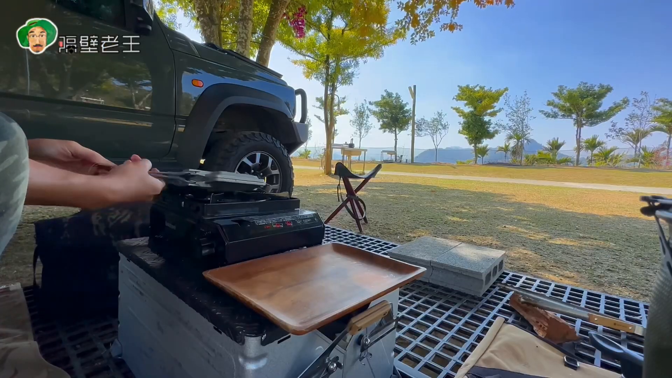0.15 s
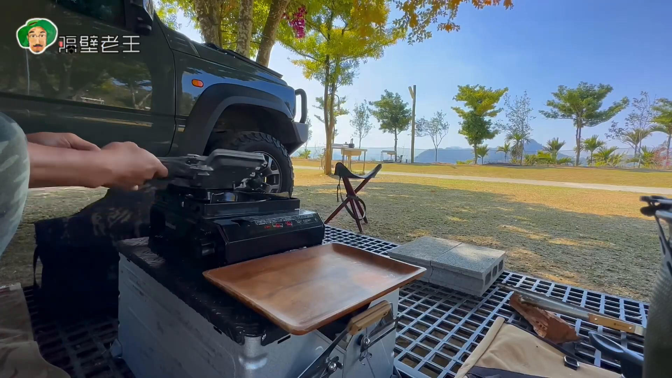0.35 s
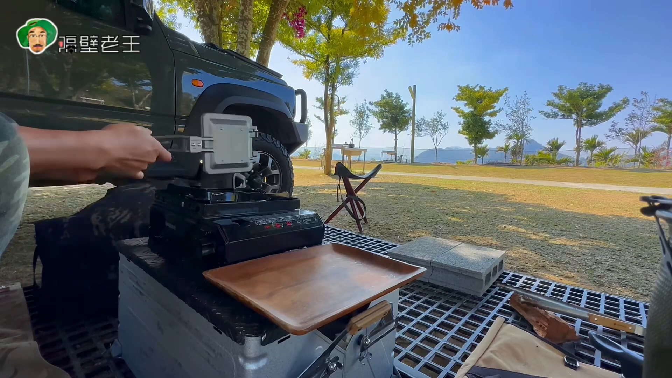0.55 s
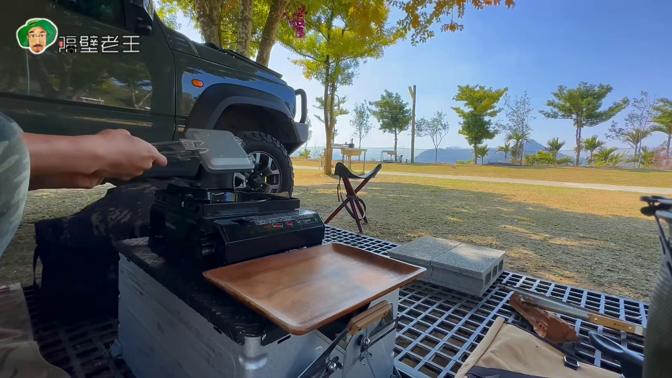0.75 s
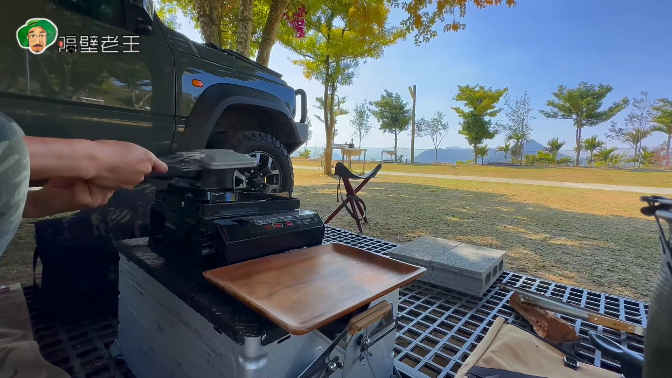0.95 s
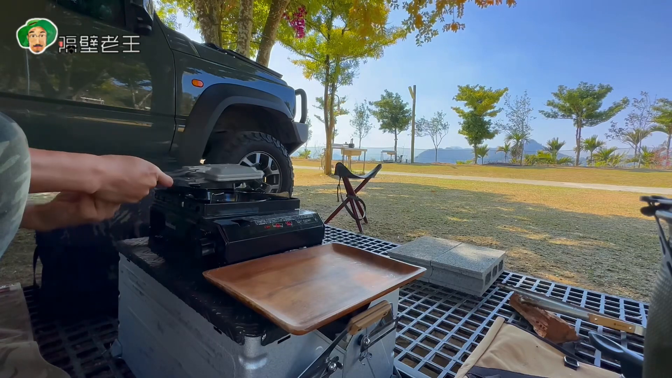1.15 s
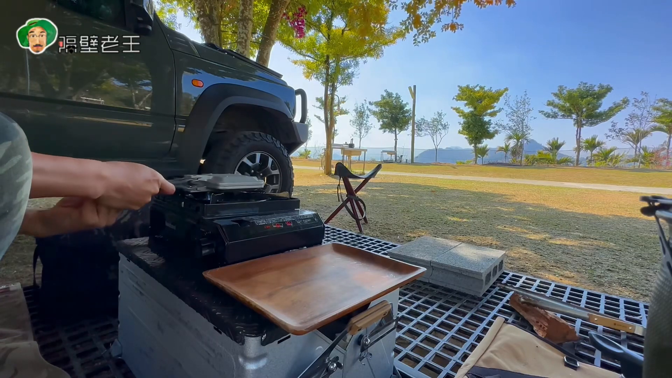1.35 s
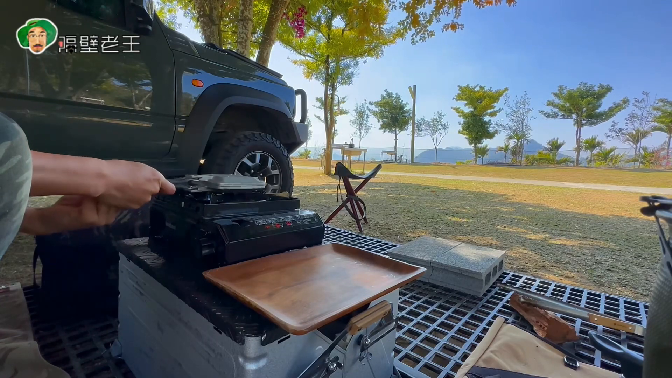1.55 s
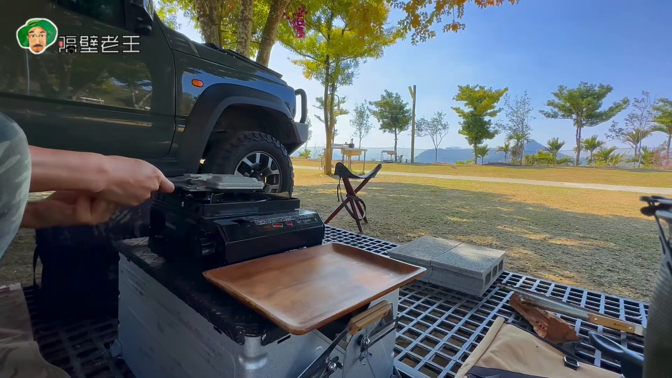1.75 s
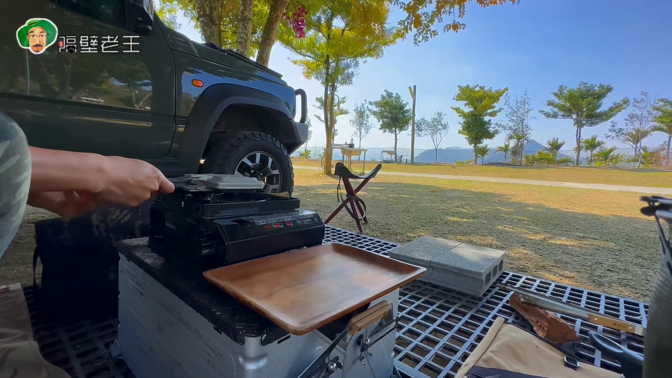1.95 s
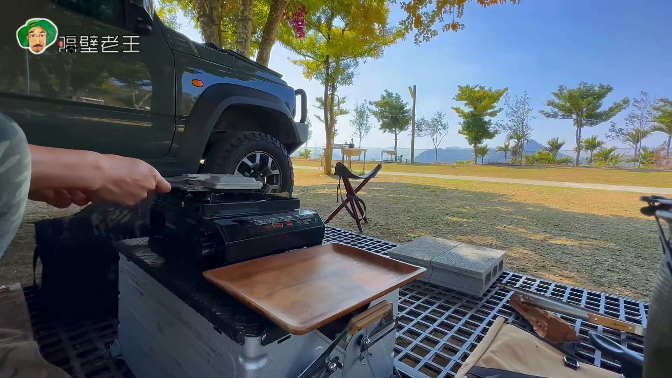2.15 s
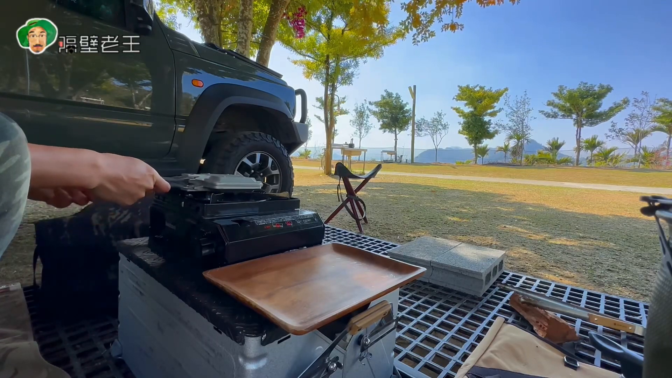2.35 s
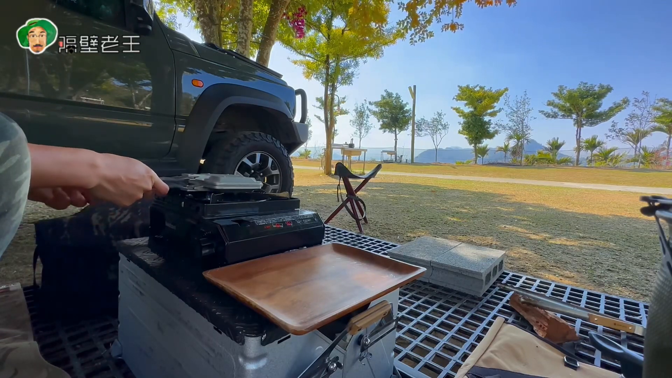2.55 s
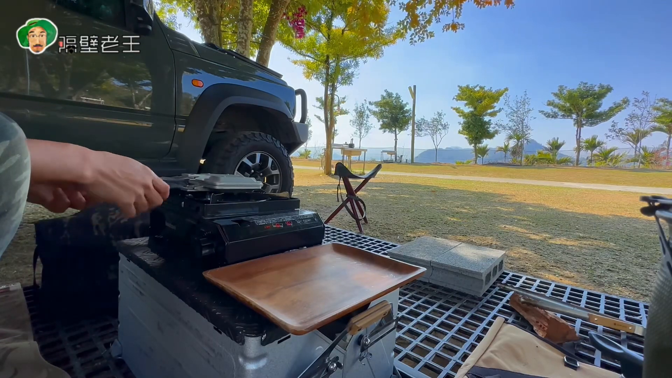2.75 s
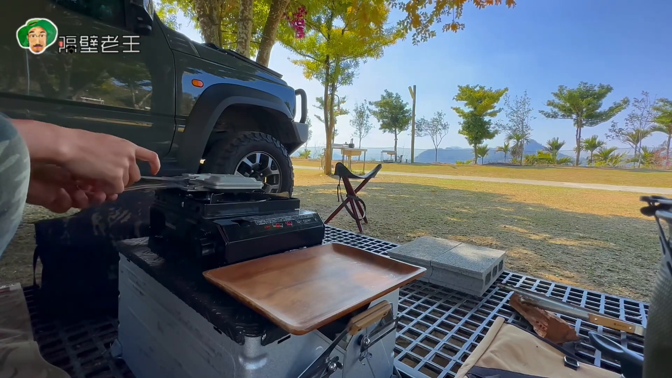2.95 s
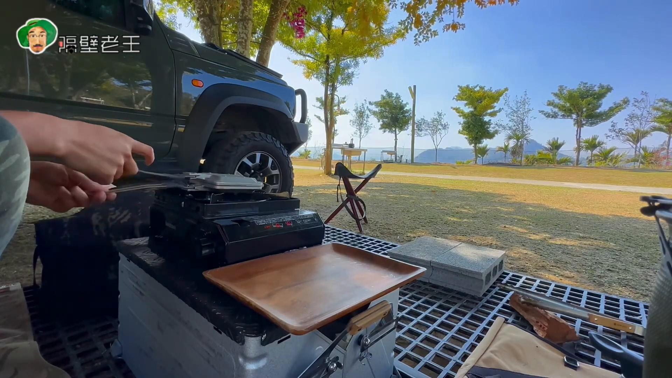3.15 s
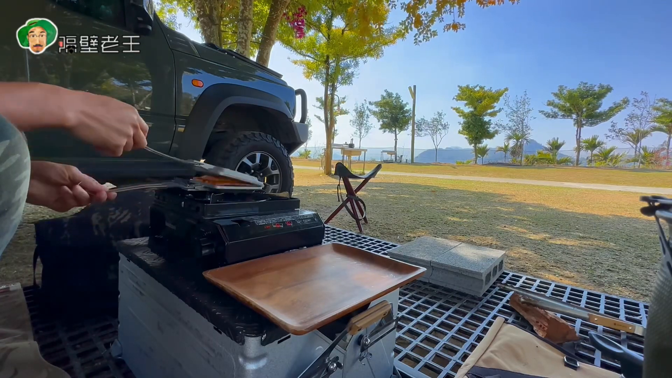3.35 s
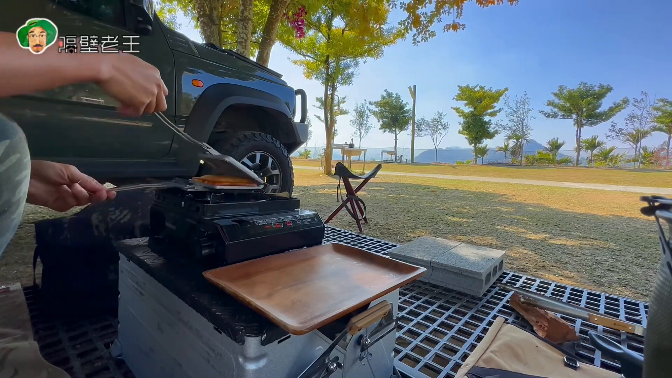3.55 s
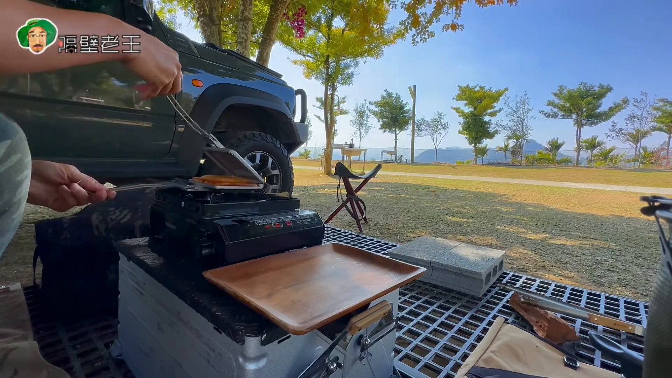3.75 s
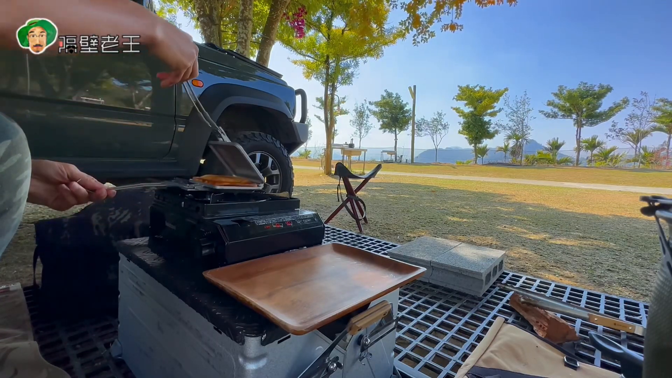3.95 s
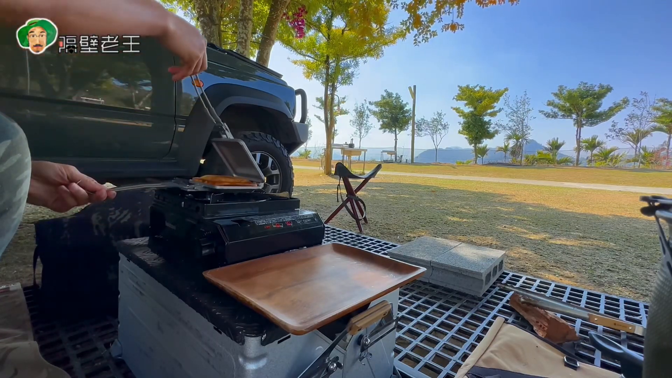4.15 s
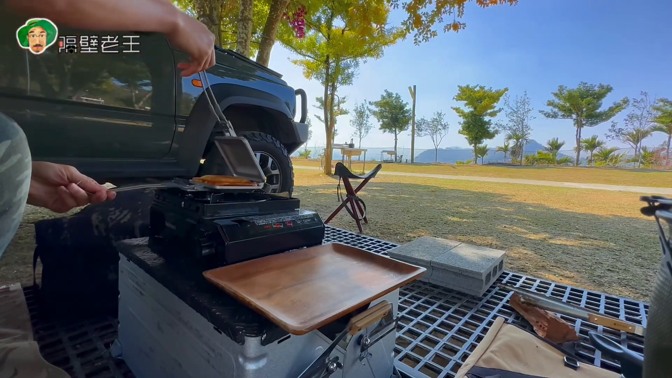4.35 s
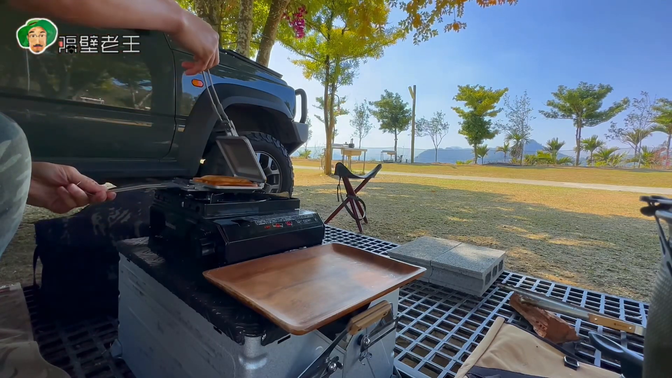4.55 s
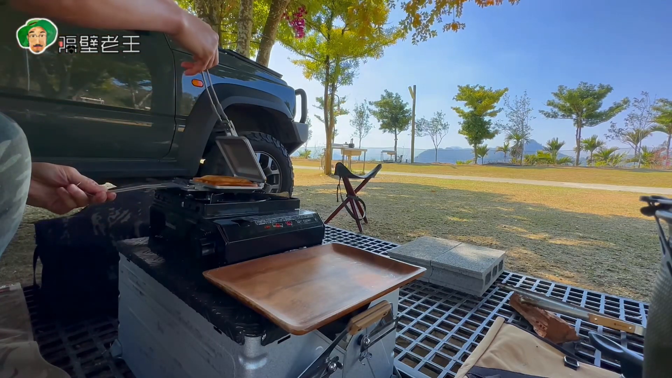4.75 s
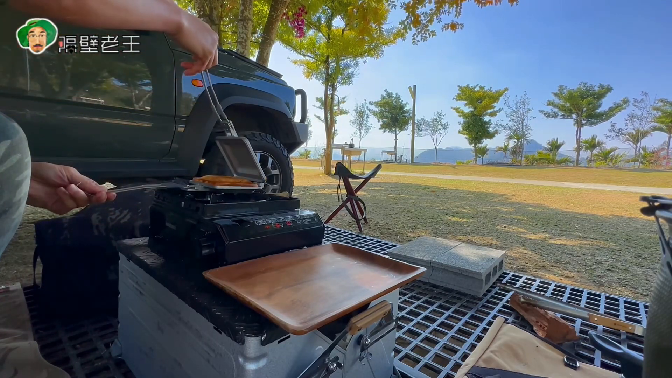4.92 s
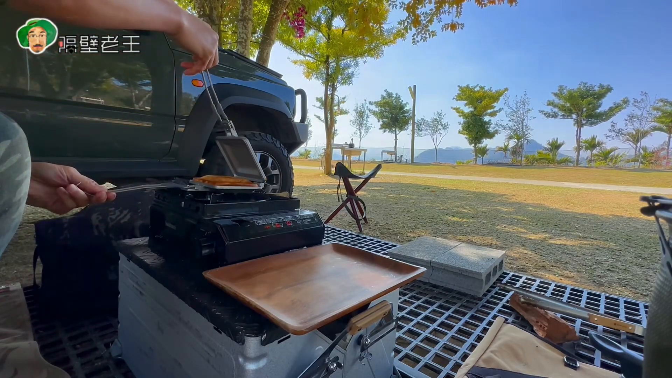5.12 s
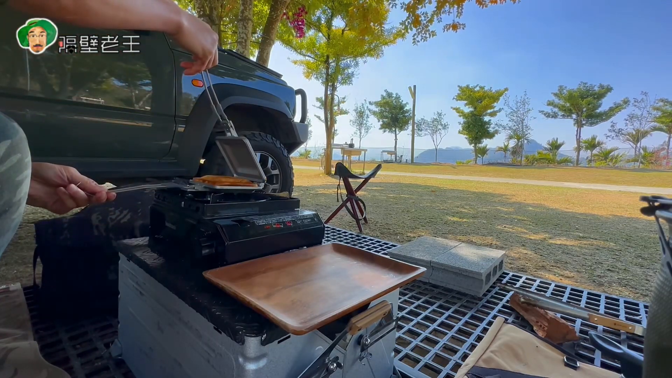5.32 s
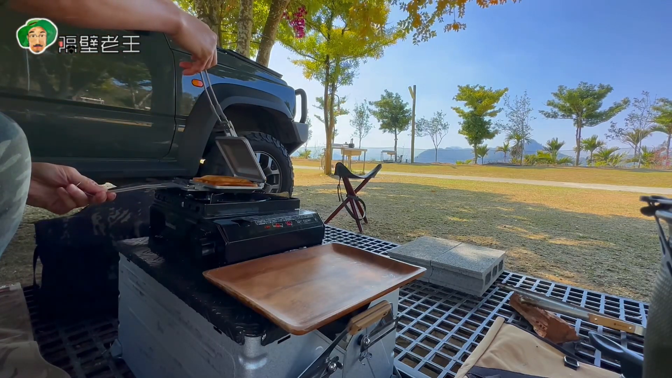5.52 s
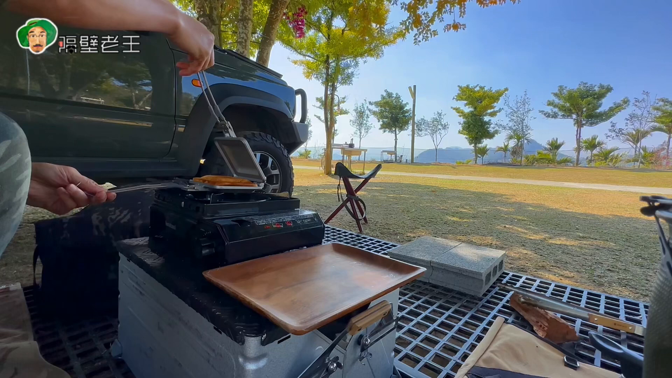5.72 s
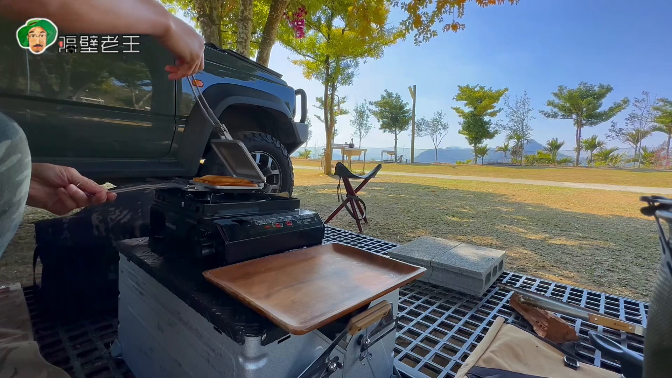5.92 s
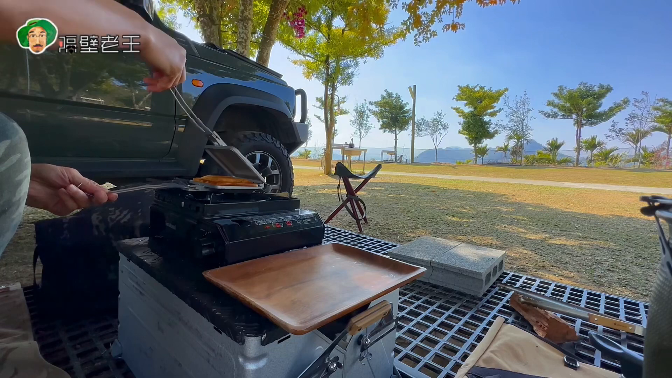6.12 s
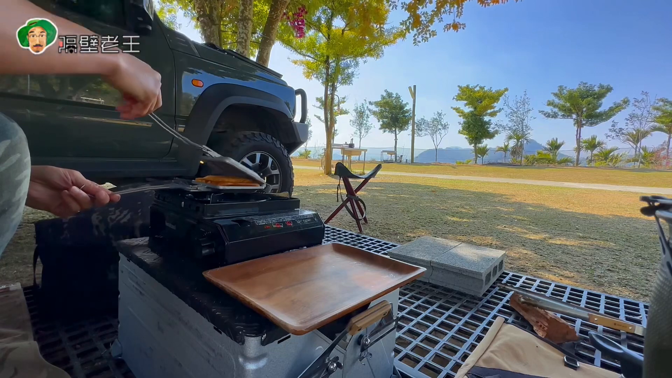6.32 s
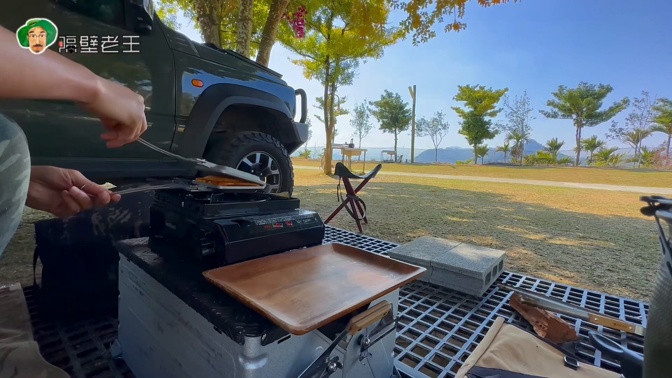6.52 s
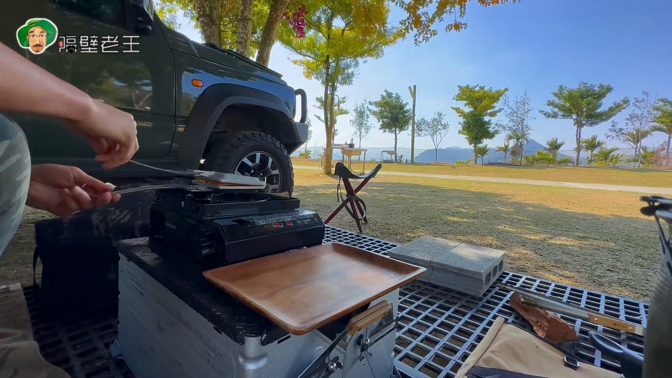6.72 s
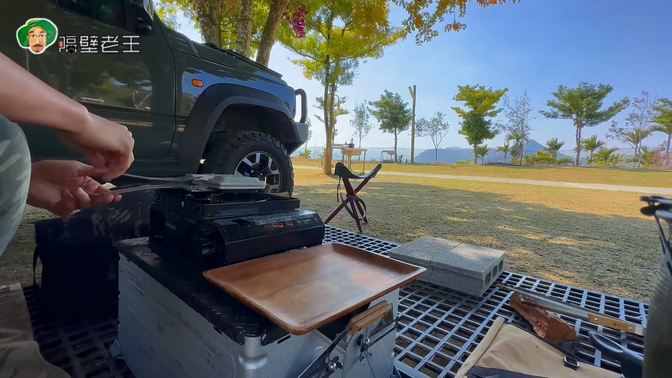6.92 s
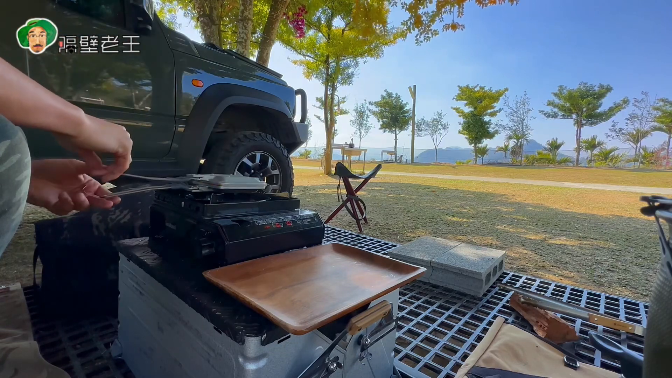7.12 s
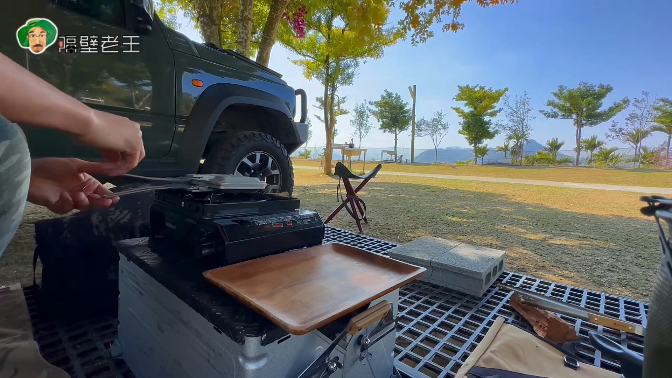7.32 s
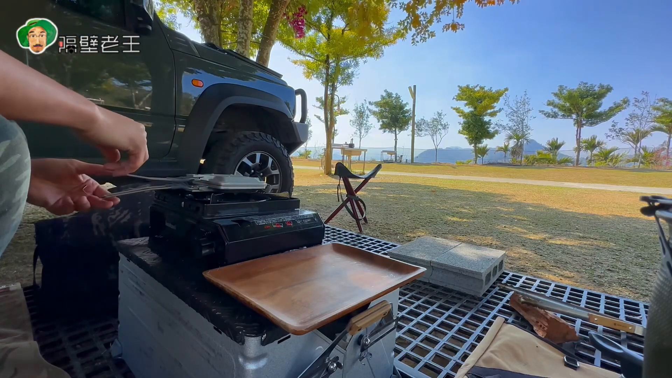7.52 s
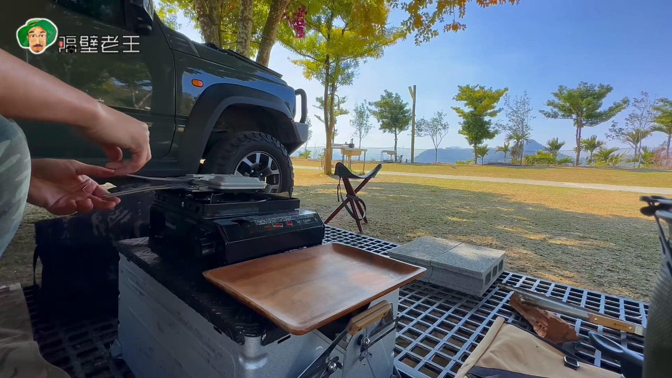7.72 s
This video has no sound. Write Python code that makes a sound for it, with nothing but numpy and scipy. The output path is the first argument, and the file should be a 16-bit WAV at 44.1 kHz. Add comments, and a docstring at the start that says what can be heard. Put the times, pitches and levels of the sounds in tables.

```python
"""Sandwich press on a camping stove, close, in wind

A long-handled metal press is turned over, set down, opened and shut again, a little left of a two-port
microphone. Blows ring filtered noise and decaying modes; scrapes, hinge judder and a late rasp shape noise.
Wind rumbles as band-split noise, with falling thumps for eddies at the ports, over a soft outdoor hiss.
The level dips briefly near the end; then the hiss has another tint and the wind less bass."""
import sys
import numpy as np
from scipy import signal
from scipy.fft import rfft, irfft, next_fast_len
from scipy.io import wavfile
from scipy.ndimage import uniform_filter1d

SR = 44100
rng = np.random.default_rng(int(sys.argv[2]) if len(sys.argv) > 2 else 0)


def dump(signal):
    """Clip the signal to [-1, 1] and save it as 16-bit WAV at the path in sys.argv[1]."""
    limited = np.clip(np.atleast_2d(signal).T, -1, 1)
    pcm = np.round(limited * 32767).astype(np.int16)
    wavfile.write(sys.argv[1], SR, pcm)


N = 343098
T = np.arange(N) / SR

# Levels in the tables are relative, ahead of the trims in the functions.
# the shut plates clap together: (time [s], peak level [dB], upper-mid colour [dB], treble colour [dB],
# contact time [s], ring level [dB], decay factor [ratio])
BLOWS = [(0.665, -54.5, -8, -21, 0.0055, -13, 0.36), (0.745, -61, -12, -25, 0.004, -8, 0.45),
         (1.345, -24, 2, -4.5, 0.0047, -8, 1.07), (3.519, -49.5, -18, -27, 0.0055, -19, 1.03),
         (6.624, -49, -14, -32, 0.0093, -9, 0.77), (6.720, -42, -7, -21, 0.012, -5, 0.7)]
# what the press rings with: (frequency [Hz], level [dB], time to fall 60 dB [s])
PRESS_MODES = [(532, 2, .22), (562, -5, .2), (724, 1, .2), (803, -3, .2), (977, 0, .19), (1159, 0, .22),
               (1283, -7, .18), (1319, -3, .16), (1860, -5, .17), (1989, -5, .15), (2040, -6, .17),
               (2145, -7, .18), (2580, -11, .2), (2883, -9, .15), (3250, -9, .14), (3324, -5, .13),
               (3644, -4, .19), (3881, -11, .16), (4029, -6, .16), (4500, -8, .14), (4885, -11, .14),
               (4928, -9, .15), (5335, -11, .2), (5515, -7, .14), (5658, -6, .17), (6460, -14, .12),
               (6942, -11, .12), (8575, -23, .2)]
# the press knocks on the stove top: (time [s], peak level [dB], upper-mid colour [dB], treble colour [dB],
# contact time [s], ring level [dB], decay factor [ratio])
LANDINGS = [(1.422, -26, -1.5, -16, 0.0065, -5, 0.83), (1.587, -33, -3, -26, 0.0079, -9, 1.33),
            (1.715, -44, -15, -22, 0.0097, -9, 2.7), (1.748, -45.5, -14, -22, 0.006, -4, 1.1),
            (1.885, -35.5, -1.5, -17, 0.0059, -9.5, 0.98), (2.085, -44, -9, -26, 0.0065, -5, 1.4),
            (6.788, -30, -0.5, -13.5, 0.011, -13, 1.11)]
# what press and stove top ring with together: (frequency [Hz], level [dB], time to fall 60 dB [s])
STOVE_MODES = [(468, -3, .17), (526, 3, .17), (600, -3, .17), (713, -4, .17), (785, -3, .16),
               (872, -7, .18), (1055, -10, .17), (1193, -5, .2), (1285, -9, .17), (1715, -11, .16),
               (1850, -8, .2), (2036, -10, .16), (2148, -8, .17), (2266, -9, .15), (3127, -12, .15),
               (3251, -9, .15), (3644, -11, .18), (5235, -7, .14), (5355, -7, .16), (5540, -13, .16),
               (5700, -10, .18)]
# the open lid hits its stop: (time [s], peak level [dB], upper-mid colour [dB], treble colour [dB],
# contact time [s], ring level [dB], decay factor [ratio])
LID_STOPS = [(4.483, -24.5, -1.5, -9, 0.0044, -9, 1)]
# what the free lid rings with: (frequency [Hz], level [dB], time to fall 60 dB [s])
LID_MODES = [(404, -2, .15), (490, 3, .22), (626, 1, .18), (798, -1, .2), (872, -2, .15), (1150, -2, .21),
             (1435, -12, .26), (1546, -9, .3), (1810, -4, .22), (2003, -8, .26), (2085, -5, .22),
             (2495, -5, .22), (3044, -3, .15), (3195, -6, .15), (3303, -3, .13), (3570, -7, .13),
             (4235, -8, .19), (4444, -5, .15), (4860, -7, .15), (5338, -1, .11), (5421, -4, .12),
             (5644, -8, .13)]
# the loose hinge knocks as its slack is taken up: (time [s], peak level [dB], upper-mid colour [dB],
# treble colour [dB], contact time [s], ring level [dB], decay factor [ratio])
HINGE_KNOCKS = [(0.017, -35.5, -15, -15, 0.013, -4.5, 2.6), (0.098, -23, 1.5, -13.5, 0.013, -5, 0.96),
                (0.232, -43.5, 0, -31, 0.003, -2, 0.6), (0.27, -48.5, -6, -28, 0.003, -6, 0.87),
                (6.216, -42, 1, -5.5, 0.015, -7, 1.9), (6.313, -37.5, -11, -5, 0.013, -9.5, 1.06)]
# what the hinge end rings with: (frequency [Hz], level [dB], time to fall 60 dB [s])
HINGE_MODES = [(548, 1, .16), (723, 5, .16), (795, 2, .17), (978, -2, .22), (1158, -1, .14),
               (1279, -6, .15), (1832, -5, .14), (2584, -10, .16), (3262, -5, .17), (4380, -4, .13),
               (4521, -8, .12), (4720, -7, .12), (4920, -9, .13), (5146, -8, .12), (5356, -8, .32),
               (5722, -10, .14), (9447, -13, .13)]
# the handles click as they part: (time [s], peak level [dB], upper-mid colour [dB], treble colour [dB],
# contact time [s], ring level [dB], decay factor [ratio])
CLICKS = [(3.124, -33, 0, -5.5, 0.0042, -7, 0.99), (3.215, -52, -13, -16, .008, -14, 0.97)]
# what the handles ring with: (frequency [Hz], level [dB], time to fall 60 dB [s])
HANDLE_MODES = [(503, -4, .25), (560, -2, .2), (721, -5, .18), (807, -4, .16), (1060, -3, .15),
                (1412, 7, .11), (1948, -4, .12), (2201, -2, .11), (2340, -5, .08), (3147, -7, .15),
                (3696, -8, .13), (3902, -8, .12), (4059, -6, .11), (4198, -8, .12), (6029, -12, .12),
                (7370, -15, .13), (8419, -15, .1)]
# the clasp is flipped off the handles: (time [s], peak level [dB], upper-mid colour [dB],
# treble colour [dB], contact time [s], ring level [dB], decay factor [ratio])
CLASP_FLIPS = [(2.375, -39, -2, -11, 0.0032, -1, 1)]
# what the clasp rings with: (frequency [Hz], level [dB], time to fall 60 dB [s])
CLASP_MODES = [(592, -5, .15), (723, 3, .12), (812, -3, .14), (1150, 1, .12), (1427, 3, .07),
               (1841, -9, .12), (2038, -6, .11), (2627, -9, .16), (3064, -3, .1), (3278, -7, .13),
               (3850, -13, .2), (4774, -11, .16), (5259, -6, .13)]
# the crowd of short resonances between those modes: (frequency [Hz], density [dB per Hz],
# time to fall 60 dB [s])
CLATTER = [(66, -12, 0.29), (137, 6, 0.24), (296, -3, 0.18), (399.5, -1.5, 0.25), (546, 2.5, 0.24),
           (1090, -10, 0.28), (1260, -4, 0.29), (1560, -7, 0.21), (2290, -5.5, 0.18), (3970, -10.5, 0.17),
           (4700, -11, 0.13), (5840, -11, 0.12), (6370, -12.5, 0.16), (6850, -12, 0.11), (8500, -21, 0.16),
           (9970, -15.5, 0.12), (10700, -55, 0.069), (13600, -28, 0.082)]
# strokes of metal sliding on metal: (start [s], length [s], level [dB], treble [dB])
SCRAPES = [(0.016, 0.13, -40, 0), (0.166, 0.037, -46, -18), (1.687, 0.11, -52, -20),
           (1.844, 0.046, -46.5, -2), (1.932, 0.048, -53, -22), (2.018, 0.078, -51, -15),
           (3.167, 0.097, -55.5, -1), (6.208, 0.13, -43.5, -12)]
# colour of the sliding contact: (frequency [Hz], level [dB])
SCRAPE_COLOUR = [(200, -9), (400, 7), (560, 10), (760, 8), (950, 3), (1250, -6), (2000, 1), (3500, -17),
                 (5500, -29), (8000, -37), (15000, -37)]
# the hinge catches and slips while the lid is held open: (time [s], peak level [dB])
HINGE_SLIPS = [(5.262, -50.5), (5.314, -52), (5.352, -46.5), (5.425, -49.5), (5.479, -47.5), (5.583, -51.5),
               (5.611, -52.5), (5.654, -52.5), (5.705, -56), (5.755, -58), (5.8, -58), (5.875, -51.5),
               (5.936, -56), (5.99, -52.5), (6.048, -61), (6.108, -53), (6.147, -55), (6.183, -50.5),
               (6.25, -50), (6.29, -48), (6.409, -52.5), (6.455, -55), (6.495, -57.5), (6.582, -64)]
# colour of the hinge judder: (frequency [Hz], level [dB])
JUDDER_COLOUR = [(200, -26), (380, 3.5), (550, 9.5), (720, -3), (880, 4), (1050, -5.5), (1300, 8),
                 (1520, 0), (1800, -9), (3000, -16), (6000, -45)]
# faint squeaks: (time [s], length [s], middle pitch [Hz], rms level [dB])
SQUEAKS = [(5.187, .07, 2580, -57), (5.315, .08, 2900, -56.5)]
# colour of the rasp: (frequency [Hz], level [dB])
SWELL_COLOUR = [(300, -7), (550, 6.5), (880, 14), (1250, -1), (1600, 6), (1780, -4), (1865, 7), (1960, -7),
                (2200, 6), (2500, 3), (2800, -3.5), (3300, -5), (4200, -28), (7000, -38)]
# small ticks within the rasp: (time [s], peak level [dB])
TICKS = [(7.304, -47.5), (7.397, -50), (7.42, -53), (7.524, -53), (7.551, -55), (7.582, -45.5),
         (7.603, -49), (7.624, -51), (7.67, -46), (7.708, -51), (7.73, -51)]
# the strongest eddies that hit the ports: (time [s], peak level [dB], starting pitch [Hz])
BUFFETS = [(1.829, -31, 400), (3.694, -33.5, 450), (3.727, -30, 380), (3.763, -38, 430), (3.796, -31, 395),
           (3.802, -17, 430), (3.813, -26, 555), (3.821, -23, 270), (4.119, -26.5, 600), (4.224, -37, 258),
           (4.464, -27, 400), (4.557, -28, 450), (4.638, -26.5, 443), (4.692, -24, 444),
           (4.718, -30.5, 670), (4.751, -24.5, 470), (4.815, -29, 484), (4.842, -23.5, 390),
           (4.911, -18, 586), (5.114, -31, 447), (5.196, -34, 345), (5.218, -29, 540), (5.348, -32, 407),
           (5.43, -29, 320), (5.518, -24, 400), (5.59, -22.5, 535), (6.756, -24, 290), (6.821, -17, 463),
           (6.861, -32, 260), (6.903, -26.5, 275), (6.961, -27, 414), (7.089, -26, 501), (7.182, -35, 590),
           (7.247, -31.5, 320), (7.27, -28, 623), (7.288, -27, 280), (7.471, -31, 646), (7.531, -28, 340)]
# strength of the breeze at the ports: (time [s], rms level [dB])
WIND = [(0.0, -57), (0.6, -57.5), (1.0, -58), (1.3, -53.5), (1.6, -45), (2.101, -56), (2.26, -43),
        (2.46, -63), (2.8, -71), (3.2, -52.5), (3.45, -46.5), (4.0, -48.5), (4.5, -43.5), (5.0, -43.5),
        (5.55, -43), (6.1, -52.5), (6.45, -50), (6.6, -47), (6.9, -41), (7.2, -47), (7.78, -42.5)]
# short gusts on top of it: (middle [s], width at half height [s], rms level [dB], sharpness [dB per octave])
GUSTS = [(0.347, 0.13, -49, -1), (1.161, 0.022, -40, -4.5), (1.75, 0.029, -53, -3),
         (1.854, 0.065, -42, 2.5), (3.48, 0.12, -36.5, 0.5), (3.735, 0.073, -45, 6),
         (3.819, 0.061, -30, -1), (4.242, 0.046, -33, -7), (4.339, 0.09, -38.5, 2.5),
         (4.493, 0.067, -39.5, 7), (4.643, 0.048, -37.5, 4), (4.693, 0.017, -45, 4),
         (4.747, 0.093, -35.5, 3), (4.855, 0.087, -37, 1.5), (4.931, 0.042, -30, 0.5),
         (5.02, 0.053, -40, 1), (5.095, 0.05, -35, 1.5), (5.239, 0.044, -37, 3.5), (5.351, 0.052, -38, 2),
         (5.449, 0.035, -40.5, 6), (5.546, 0.1, -34.5, 2.5), (5.684, 0.04, -32, -19),
         (6.336, 0.12, -44, -2), (6.435, 0.11, -46, 5.5), (6.771, 0.052, -34.5, 3),
         (6.846, 0.059, -39.5, 7), (6.931, 0.041, -33, 1.5), (7.1, 0.043, -43, -6),
         (7.255, 0.11, -44.5, 2.5), (7.363, 0.021, -42, 1.5), (7.45, 0.056, -42, 2),
         (7.553, 0.082, -46.5, 4)]
# colour of the wind: (frequency [Hz], level [dB])
WIND_COLOUR = [(25, -27), (40, -6.5), (60, 6.5), (90, 2.5), (140, -3), (220, -10.5), (350, -26), (550, -33),
               (900, -38.5)]
# outdoor hiss: (frequency [Hz], mid density [dB per Hz], side density [dB per Hz])
AIR = [(63, -82.5, -82), (112, -86, -92), (164, -85, -90), (236, -87, -100), (355, -84.5, -99),
       (502, -87, -88.5), (670, -100, -99), (1040, -104, -101), (1200, -102, -100), (2940, -103, -104),
       (5800, -101, -101), (8400, -104, -104), (10030, -106, -106), (10600, -110, -112)]
# tint of the hiss after the brief dip: (frequency [Hz], level [dB])
LATE_TINT = [(250, -4), (400, -15), (700, -7), (1200, -3.5), (2800, -1.5), (5500, -4.5), (8000, -2),
             (10000, 6.5), (14000, 5)]
# balance of the ports for all but the wind: (frequency [Hz], left minus right [dB])
PORT_BALANCE = [(100, 2), (700, 1), (1300, 2.5), (2400, 1.5), (4400, 5.5), (8000, 3.5), (12000, -0.5)]

SWELL_START_S, SWELL_DB, SWELL_RISE_DB_PER_S = 7.21, -74.5, 46.5
DIP_S, TOP_HZ = 7.162, 15800


def undb(db):
    """Decibels to gain."""
    return 10 ** (np.asarray(db) / 20)


def unit(x):
    """Scale to rms 1."""
    return x / np.sqrt(np.mean(x ** 2))


def at_hz(hz, table, axis=1):
    """Read a column of a spectrum table on a log-frequency axis."""
    table = np.array(table, float)
    return np.interp(np.log(np.maximum(hz, 1)), np.log(table[:, 0]), table[:, axis])


def at_time(t, table, axis=1):
    """Read a column of a control curve."""
    table = np.array(table, float)
    return np.interp(t, table[:, 0], table[:, axis])


def colour(x, table, axis=1):
    """Filter by a table of frequencies and levels."""
    n = x.shape[-1]
    size = next_fast_len(n + 2048)
    gain = undb(at_hz(np.fft.rfftfreq(size, 1 / SR), table, axis))
    return irfft(rfft(x, size) * gain, size)[..., :n]


def bands(x, centres):
    """Split into overlapping bands that sum to the whole."""
    n = x.shape[-1]
    size = next_fast_len(n)
    spectrum = rfft(x, size)
    pitch = np.log(np.fft.rfftfreq(size, 1 / SR) + 1)
    weights = [np.interp(pitch, np.log(centres), row) for row in np.eye(len(centres))]
    return [irfft(spectrum * weight, size)[..., :n] for weight in weights]


def noise(n, likeness=0):
    """Two channels of white noise with a given correlation."""
    mid, side = rng.standard_normal((2, n))
    c = np.clip(likeness, -1, 1)
    return np.sqrt((1 + c) / 2) * mid + np.sqrt((1 - c) / 2) * np.array([side, -side])


def walk(rate, n=N):
    """Random levels held 1 / rate s and smoothed; spread near 1."""
    k = max(int(SR / rate), 1)
    steps = np.repeat(rng.standard_normal(n // k + 2), k)
    return unit(uniform_filter1d(uniform_filter1d(steps, k), k))[:n]


def add(out, start_s, sound):
    """Mix a sound in at a given time."""
    i = max(int(start_s * SR), 0)
    out[:, i:i + sound.shape[1]] += sound[:, :N - i]


def peak_level(x, lo_hz, hi_hz):
    """Highest short-term level within a band."""
    band = signal.sosfilt(signal.butter(2, [lo_hz, hi_hz], "band", fs=SR, output="sos"), x)
    return np.sqrt(uniform_filter1d(np.mean(band ** 2, 0), SR // 60).max())


def clack(mode_table, contact_s, ring_db, decay):
    """The loose parts chatter for a moment, then ring out; the stove below answers late with a thud."""
    rise_s, low_rise_s, ring_rise_s = 0.0025, 0.012, 0.0011
    t = np.arange(SR // 3) / SR
    free = np.maximum(t - contact_s, 0) / decay
    # every blow lands elsewhere and favours other groups of short resonances
    spot = np.column_stack([np.geomspace(400, 15000, 44), 1.6 * rng.standard_normal(44)])
    hz, _, t60 = np.transpose(CLATTER)
    crowd = bands(unit(colour(colour(noise(len(t), 0.4), CLATTER), spot)), hz)
    body = 0
    for band, f, d in zip(crowd, hz, t60):
        onset = 1 - np.exp(-t / (low_rise_s if f < 400 else rise_s))
        body = body + band * np.exp(-np.log(1000) * free / d) * onset
    # the long modes keep their pitch, but reach the two ports in differing phases
    hz, db, t60 = np.transpose(mode_table)[:, :, None]
    share = undb(db + rng.standard_normal(db.shape))
    modes = share * np.exp(2j * np.pi * hz * t - np.log(1000) * free / t60)
    phase = 2 * np.pi * rng.random(len(hz)) + 0.92 * rng.standard_normal((2, len(hz)))
    ring = (np.exp(1j * phase) @ modes).imag
    return body + undb(ring_db) * ring * (1 - np.exp(-t / ring_rise_s))


def blows(table, mode_table, gain_db, upper_db, treble_db, pan_db, thud_db=0.0):
    """Each blow has its own force and hardness: harder contact is brighter."""
    out = np.zeros((2, N))
    pan = np.array([[pan_db], [-pan_db]]) / 2  # pan_db is left minus right
    for s, db, upper, treble, contact_s, ring_db, decay in table:
        hardness = [(280, thud_db), (420, 0), (1200, 0.0031), (2300, upper + upper_db), (5500, treble + treble_db)]
        hit = colour(clack(mode_table, contact_s, ring_db, decay), hardness)
        level = undb(db + gain_db + pan)
        add(out, s - 0.002, hit / peak_level(hit, 275, 1940) * level)
    return out


def plates():
    """The shut plates clap together and ring with the modes of the press."""
    return blows(BLOWS, PRESS_MODES, gain_db=0, upper_db=0.0, treble_db=7.0, pan_db=-0.5, thud_db=1)


def landings():
    """The press knocks on the stove top and the two ring together."""
    return blows(LANDINGS, STOVE_MODES, gain_db=-3.0, upper_db=-0.5, treble_db=7.5, pan_db=0.0, thud_db=3)


def lid_stop():
    """The open lid hits its stop and rings freely."""
    return blows(LID_STOPS, LID_MODES, gain_db=-4.5, upper_db=4.5, treble_db=6.5, pan_db=1.3, thud_db=-4.5)


def hinge_knocks():
    """The loose hinge knocks as its slack is taken up."""
    return blows(HINGE_KNOCKS, HINGE_MODES, gain_db=-7.0, upper_db=4.0, treble_db=7.0, pan_db=-0.5)


def handle_clicks():
    """The long handles click and ring as they part."""
    return blows(CLICKS, HANDLE_MODES, gain_db=-3.0, upper_db=2.0, treble_db=6.5, pan_db=0.5)


def clasp_flip():
    """The clasp rings as it is flipped off the handles."""
    return blows(CLASP_FLIPS, CLASP_MODES, gain_db=-2.0, upper_db=7.0, treble_db=7.5, pan_db=-0.5)


def resonate(force, width_hz=28):
    """Drive the modes of the press, damped by the contact."""
    t = np.arange(SR // 8) / SR
    hz, db, _ = np.transpose(PRESS_MODES)[:, :, None]
    modes = undb(db) * np.exp((2j * hz - width_hz) * np.pi * t)
    response = (np.exp(2j * np.pi * rng.random((2, len(hz)))) @ modes).imag
    return unit(signal.fftconvolve(force, response, axes=1)[:, :force.shape[1]])


def scrapes(gain_db=-1, ring_db=-3, treble_db=2, rough_db=1.5, attack_s=0.015, release_s=0.029):
    """Uneven stick-slip contact shakes the plates as they slide; each stroke builds, holds and dies away."""
    out = np.zeros((2, N))
    t = np.arange(SR // 3) / SR
    for s, length, db, treble in SCRAPES:
        force = noise(len(t), 0.22) * undb(rough_db * walk(136.0, len(t)))
        rub = unit(colour(force, SCRAPE_COLOUR)) + undb(ring_db) * resonate(force)
        low, high = bands(unit(rub), [1300, 2400])
        pressure = np.minimum(t / attack_s, 1) * np.exp(-np.maximum(t - length, 0) / release_s)
        stroke = low + high * undb(min(treble + treble_db, 0))
        add(out, s, stroke * pressure * undb(db + gain_db))
    return out


def judders(gain_db=0.5, rub_db=-65, rough_db=3.0, fade_s=0.049, rise_s=0.016):
    """The hinge rubs all the while and slips at an uneven rate; each slip is a short, dull, grainy surge."""
    t = np.arange(SR // 8) / SR
    surge = (t / rise_s * np.exp(1 - t / rise_s)) ** 2
    surges = np.zeros((1, N))
    for s, db in HINGE_SLIPS:
        add(surges, s - rise_s, undb(db + gain_db) * surge[None])
    inside_s = np.minimum(T - HINGE_SLIPS[0][0], HINGE_SLIPS[-1][0] - T)  # negative outside the slips
    rub = undb(rub_db) * np.clip(1 + inside_s / fade_s, 0, 1)
    grain = unit(colour(noise(N, 0.35) * undb(rough_db * walk(260)), JUDDER_COLOUR))
    return np.hypot(surges, rub) * grain


def squeaks(width_hz=130, sag_hz_per_s=5500):
    """Faint, hoarse squeaks of a few hundredths of a second: falling tones with a noisy strength."""
    out = np.zeros((2, N))
    lowpass = signal.butter(2, width_hz, fs=SR, output="sos")
    for s, length, hz, db in SQUEAKS:
        n = int(length * SR)
        pitch = hz - sag_hz_per_s * (T[:n] - length / 2)
        waver = unit(signal.sosfilt(lowpass, noise(n, 0.47)))
        tone = np.sin(2 * np.pi * np.cumsum(pitch) / SR)
        add(out, s, unit(waver * tone) * np.hanning(n) * undb(db))
    return out


def slips(start_s, end_s, per_s, jitter, rise_s, scatter_db, count=64):
    """Strength of a stick-slip contact: a train of short surges, uneven in pace and size."""
    wait, size = rng.standard_normal((count, 2)).T
    times = start_s + np.cumsum(np.exp(jitter * wait)) / per_s
    t = np.arange(SR // 8) / SR
    surge = t / rise_s * np.exp(1 - t / rise_s)
    out = np.zeros((1, N))
    for s, db in zip(times[times < end_s], scatter_db * size):
        add(out, s, undb(db) * surge[None])
    return out


def swell(rough_db=2.0, pulse_db=4, rub_db=-4, pulses_per_s=85, fade_s=0.022, tick_decay_s=0.0063):
    """A rasp of rapid little catches that grows louder, with a few small ticks in it."""
    age = np.maximum(T - SWELL_START_S, 0)
    catches = slips(SWELL_START_S, T[-1], pulses_per_s, jitter=0.345, rise_s=0.0012, scatter_db=-0.5)
    growth = undb(SWELL_DB + SWELL_RISE_DB_PER_S * age) * np.minimum(age / fade_s, 1)
    rub = growth * np.hypot(undb(pulse_db) * catches, undb(rub_db))
    ticks = np.zeros((1, N))
    t = np.arange(SR // 20) / SR
    for s, db in TICKS:
        add(ticks, s, undb(db) * np.exp(-t / tick_decay_s)[None])
    grain = unit(colour(noise(N, 0.12) * undb(rough_db * walk(420)), SWELL_COLOUR))
    return np.hypot(rub, ticks) * grain


def eddy(hz, glide_s=0.0092, cycles=2.73, rise_s=0.00092, right_db=-4.0, skew=0.65):
    """An eddy is a thump of a few cycles that sags in pitch, nearly opposite in the two ports."""
    t = np.arange(SR // 12) / SR
    phase = 2 * np.pi * hz * glide_s * np.log1p(t / glide_s)
    size = np.exp(-t * hz / cycles) * (1 - np.exp(-t / rise_s))
    return size * np.array([np.sin(phase), -undb(right_db) * np.sin(phase + skew)])


def buffets(scatter_db=4, pitch_hz=400, count=230):
    """A few big eddies hit the ports, and many small ones that grow with the breeze."""
    out = np.zeros((2, N))
    for s, db, hz in BUFFETS:
        add(out, s, undb(db) * eddy(hz))
    for when, size, pitch, sign in rng.random((count, 4)):
        s = when * N / SR
        hz = pitch_hz * 2 ** (1.5 * (pitch - .5))
        level_db = at_time(s, WIND) + scatter_db * (2 * size - 12)  # 40 to 48 dB below the breeze
        add(out, s, np.sign(sign - .5) * undb(level_db) * eddy(hz))
    return out


def wind(likeness=-0.53, flicker_db=3, surge_db=4.5, surges_per_s=18, late_db=6, late_bass_db=-5.0):
    """Turbulence pushes the ports mostly in opposite ways: a light breeze, and gusts of which some reach higher."""
    breeze = undb(at_time(T, WIND) + surge_db * walk(surges_per_s))
    late = T > DIP_S  # after the dip the wind has less bass and more above it
    tilt = np.minimum(flicker_db * walk(55) / 2, 2) + late_db * late  # dB per octave
    rumble = unit(colour(noise(N, likeness), WIND_COLOUR + [(1600, -63)]))
    out = 0
    for octave, band in enumerate(bands(rumble, [70, 140, 280, 560])):
        gusts = np.zeros((1, N))
        for s, length, db, sharpness in GUSTS:
            add(gusts, s - length, undb(db + octave * sharpness) * np.hanning(int(2 * length * SR))[None])
        out = out + band * np.hypot(breeze, gusts) * undb(octave * tilt + late_bass_db * late)
    return out


def air():
    """Steady outdoor hiss with a soft, low rush from straight ahead; its tint is different after the dip."""
    mid, side = rng.standard_normal((2, N)) * np.sqrt(SR / 2)  # so that the table reads in dB per Hz
    hiss = colour(mid, AIR) + np.array([[1], [-1]]) * colour(side, AIR, axis=2)
    hiss = signal.sosfilt(signal.butter(2, 45, "high", fs=SR, output="sos"), hiss)
    dip = int(DIP_S * SR)
    return np.hstack([hiss[:, :dip], colour(hiss[:, dip:], LATE_TINT)])


def scene():
    """The press and the air around it as the two ports hear them, with the wind on top."""
    knocks = plates() + landings() + lid_stop() + hinge_knocks() + handle_clicks() + clasp_flip()
    press = knocks + scrapes() + judders() + squeaks()
    # the press stands to the left, so it reaches the right port 0.2 ms later
    press = np.array([press[0], np.pad(press[1], (9, 0))[:N]])
    sound = press + swell() + air()
    left = colour(sound[0], [(hz, db / 2) for hz, db in PORT_BALANCE])
    right = colour(sound[1], [(hz, -db / 2) for hz, db in PORT_BALANCE])
    return np.array([left, right]) + buffets() + wind()


def record(dry):
    """The level dips briefly once, and the top is cut."""
    dip = np.interp(T - DIP_S, [-.042, -.003, .003, .024], [1, .05, .05, 1])
    top_cut = signal.ellip(8, .2, 70, TOP_HZ, fs=SR, output="sos")
    return signal.sosfilt(top_cut, dry * dip)


dry = scene()
out = record(dry)
dump(out)
```